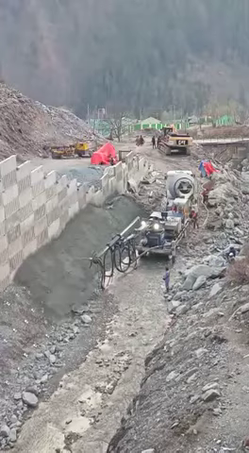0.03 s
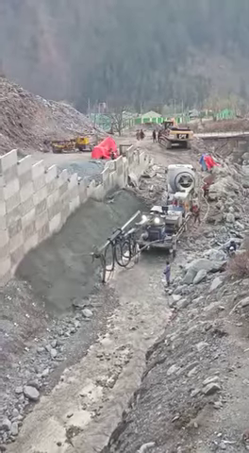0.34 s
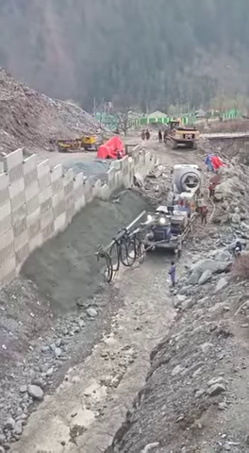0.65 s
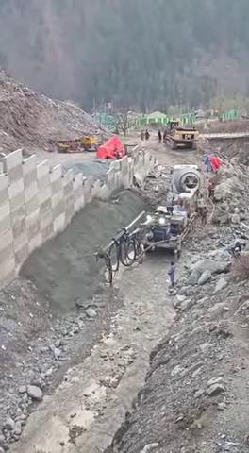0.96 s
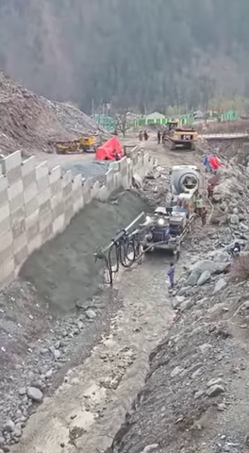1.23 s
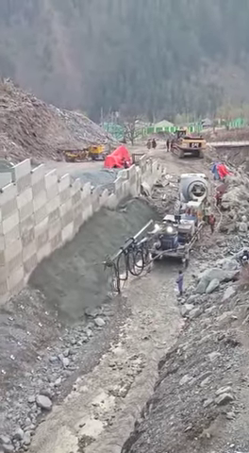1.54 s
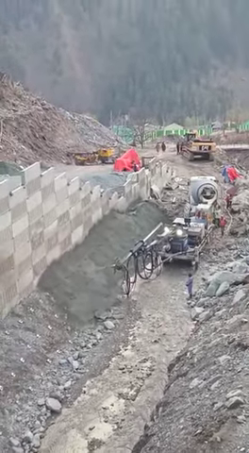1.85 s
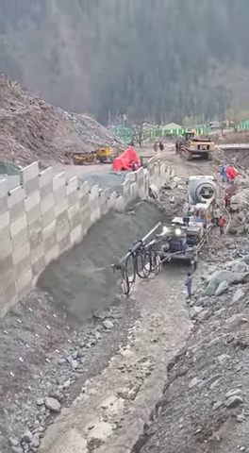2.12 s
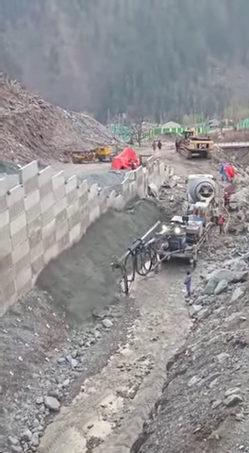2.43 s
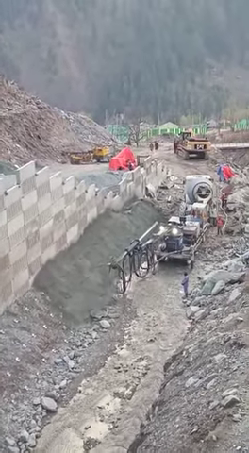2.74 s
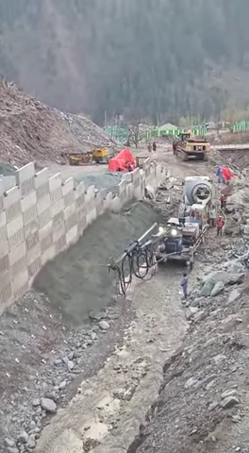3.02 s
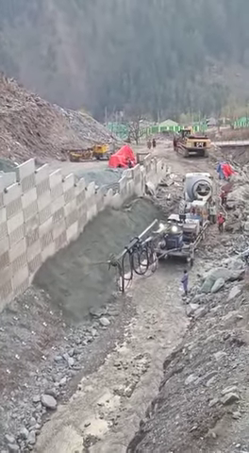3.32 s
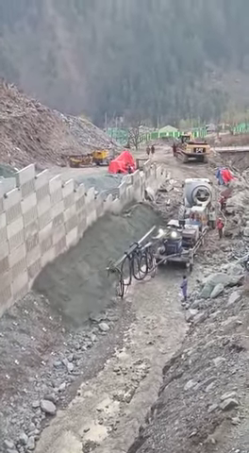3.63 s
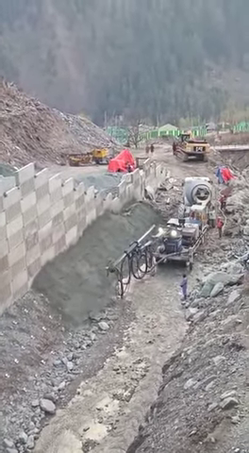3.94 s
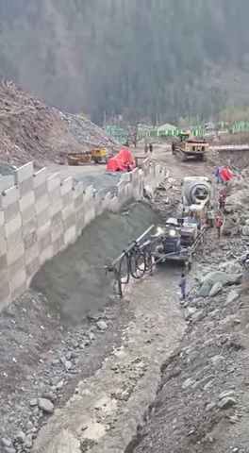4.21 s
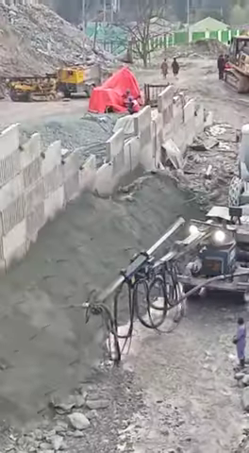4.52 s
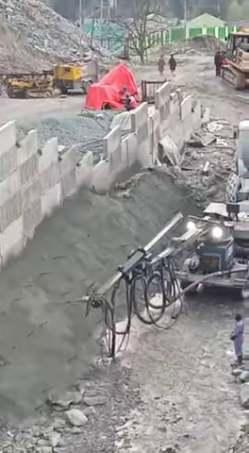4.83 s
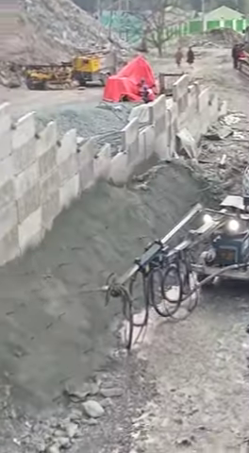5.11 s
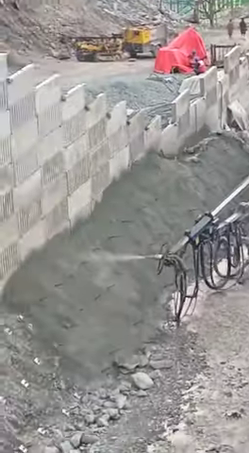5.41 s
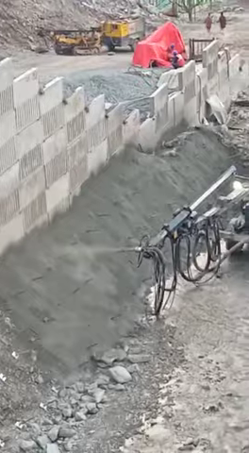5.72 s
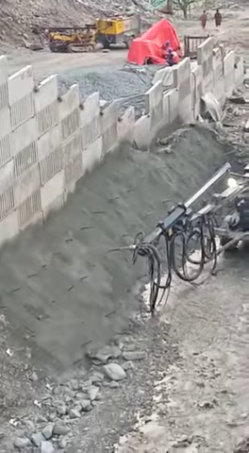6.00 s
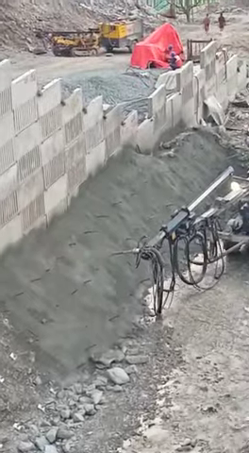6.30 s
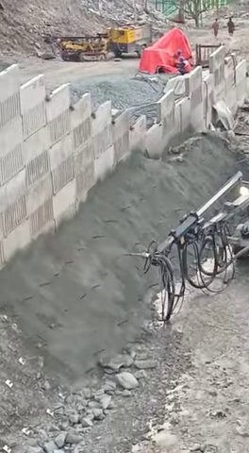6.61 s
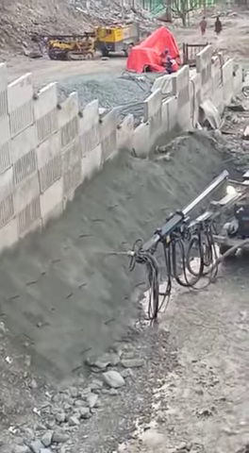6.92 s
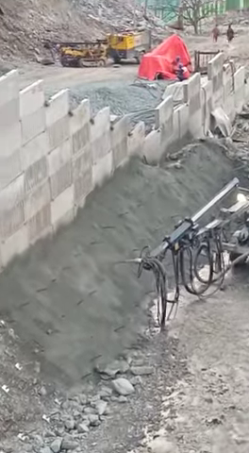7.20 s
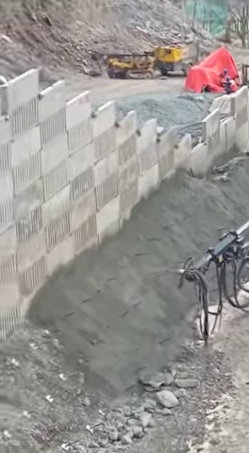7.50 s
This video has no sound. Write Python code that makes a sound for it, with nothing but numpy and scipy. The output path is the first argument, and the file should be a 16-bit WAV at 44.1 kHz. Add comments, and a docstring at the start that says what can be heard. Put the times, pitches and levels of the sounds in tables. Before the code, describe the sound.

A concrete sprayer fades in over the first 0.3 seconds and roars continuously until the end, near 7.7 seconds, some way off outdoors with a slight dull echo. The jet is gritty and sputtering, with gravel ticking through the pipe, a low hose rumble and wavering air hiss. Lumps of wet concrete burst out with irregular thuds and spatters, scattered at first, thickest from 3 to 4.8 seconds, then sparser. Faint, very high whistles flick past around 4.3 to 4.7 seconds. The hiss opens up a little near 1.5, 2.3, 5.7 and 7.5 seconds. Underneath, a diesel engine drones at a fixed speed, joined by a compressor hum and a faint pump whine, while a stream rushes steadily. Wind rumbles softly on the microphone, with a few bumps, mostly between 2 and 3 seconds.

```python
"""A concrete sprayer roars and sputters on a slope beside a stream, some way off in a valley.
Slugs (big lumps) of wet concrete break up its air jet with thuds and spatters, gravel knocks through the
pipe, and the nozzle hisses when air gets through freely. Its diesel engine drones at a fixed speed,
along with a humming compressor and a whining pump. The stream rushes underneath, and gusts of wind
bump the microphone."""
import sys
import numpy as np
from scipy import signal
from scipy.fft import rfft, irfft
from scipy.io import wavfile
from scipy.ndimage import uniform_filter1d, minimum_filter1d

SR = 44100
rng = np.random.default_rng(int(sys.argv[2]) if len(sys.argv) > 2 else 0)


def log_audio(samples):
    """Write samples as a 16-bit WAV file to the path given in sys.argv[1]."""
    # one column per channel
    frames = np.atleast_2d(samples).T
    # limit to full scale, then quantise
    limited = np.clip(frames, -1, 1)
    pcm = np.round(limited * 32767).astype(np.int16)
    wavfile.write(sys.argv[1], SR, pcm)


N = 341775
TIME = np.arange(N) / SR
AGE = np.arange(SR // 5) / SR   # seconds since the start of a short sound

# The rush of the stream: (frequency [Hz], relative level [dB])
STREAM_SPECTRUM = [(60, 3), (300, -7.5), (1000, -5), (3000, -10.5), (5300, -17), (6500, -43), (15000, -55)]
# Wind rumbling on the microphone: (frequency [Hz], relative level [dB])
WIND_SPECTRUM = [(12, -46), (30, -27), (42, -17), (55, -21.5), (76, -0.5), (105, -2), (150, -4), (260, -14),
                 (600, -37)]
# Gusts swell and die away: (peak time [s], level [dB], rise [s], fall [s])
WIND_GUSTS = [(0.82, -30.5, .08, .7), (2.48, -24, 0.67, .8), (3.9, -28, 0.18, 0.68), (7.6, -29, .12, 0.12)]
# Single bumps of wind: (time [s], relative level [dB])
WIND_BUMPS = [(2.013, -12), (2.118, -7), (2.371, -5), (2.409, -8), (2.568, -4), (2.629, -9), (2.999, -16),
              (4.179, -10)]

FIRING_HZ, COMPRESSOR_HZ = 141.6, 225.0   # pitches of the diesel and of the air compressor
# The drone of the exhaust: (time [s], level [dB])
DRONE_LEVELS = [(0.25, -24.5), (0.4, -23), (1.5, -21.5), (2.0, -27.5), (2.25, -20.5), (2.7, -24.5),
                (4.5, -25), (5.2, -22), (6.2, -25.5), (7.75, -22.5)]
# The drone dips briefly: (time [s], depth [dB], half-width [s])
DRONE_DIPS = [(0.53, 9, 0.08), (1.23, 11, 0.051), (2.52, 17, 0.055), (3.46, 7, 0.061), (4.46, 11, 0.037),
              (4.68, 5, 0.061), (5.8, 5, 0.058), (6.1, 17, 0.056), (6.94, 9, 0.056), (7.75, 11, 0.17)]
# The engine's higher tones: (multiple of the firing rate, level [dB])
ENGINE_OVERTONES = [(2, -37.5), (3, -45), (4, -45.5), (5, -45.5), (6, -49.5), (7, -44), (8, -47.5),
                    (9, -57.5), (10, -43.5), (11, -49), (12, -48.5), (15, -50)]
# The hum of the air compressor: (time [s], relative level [dB])
HUM_LEVELS = [(0.3, -34), (2.2, -36), (2.45, -23.5), (2.9, -24.5), (3.9, -28.5), (4.55, -37), (5.3, -28),
              (5.65, -36), (6.0, -29), (7.75, -34.5)]
# The whine of the hydraulic pump: (pitch [Hz], relative level [dB])
PUMP_TONES = [(795.0, -46), (1192.5, -49)]

# Air through the nozzle, heard as hiss: (time [s], relative level [dB])
AIRFLOW_LEVELS = [(0.3, -53), (0.42, -41.5), (1.1, -40), (1.6, -39), (2.4, -35.5), (2.72, -46), (3.15, -40),
                  (3.45, -39.5), (4.0, -36), (4.7, -36.5), (5.1, -41), (5.65, -35.5), (6.12, -51),
                  (6.55, -36), (7.05, -41.5), (7.75, -36.5)]
# Concrete fed to the nozzle, heard as roar: (time [s], relative level [dB])
FEED_LEVELS = [(0.3, -27.5), (0.38, -26.5), (0.46, -25), (1.65, -25), (2.65, -28), (3.05, -26.5),
               (3.35, -24.5), (4.4, -25.5), (4.8, -26), (5.4, -26.5), (5.7, -27.8), (6.15, -27),
               (6.55, -24.5), (7.1, -26), (7.75, -26)]
# The hose runs thin and air blows freely: (start [s], length [s], lip singing [dB], extra mist [dB])
FREE_AIR_SPELLS = [(1.327, 0.43, -45, 0), (2.133, 0.42, -44.5, 3.5), (4.547, 0.033, -31, -4),
                   (5.556, 0.39, -66, 5), (7.433, 0.23, -50, 2)]
# Pitches at which air rings in the nozzle: (pitch [Hz], width [Hz], level against the hiss [dB])
NOZZLE_RESONANCES = [(3153, 58, -7), (4610, 69, -7)]
# Hose rumble, fine mist, air hiss, wet spray and a slug's thud: (frequency [Hz], relative level [dB])
HOSE_SPECTRUM = [(60, -38), (110, -3.5), (165, 1), (200, -1.5), (270, 0.5), (340, -0.5), (410, -6.5),
                 (520, -9.5), (800, -50)]
MIST_SPECTRUM = [(5000, -7), (7000, 4.5), (8400, -3), (9400, -2), (11200, -0.5), (12200, -15), (13400, -10),
                 (14200, -13), (15400, -18)]
AIR_SPECTRUM = [(2500, -15), (3100, 1), (3450, 0), (4000, -4.5), (4650, 1.5), (4950, -1), (5450, -2.5),
                (5750, -11), (6400, -21.5), (8400, -42), (12000, -47)]
SPRAY_SPECTRUM = [(300, 7.5), (520, -0.5), (1150, 2), (1450, 0), (2130, 2.5), (2450, -1.5), (2850, 0.5),
                  (3400, -3.5), (3850, -9), (5300, -17), (6200, -34), (8000, -45), (11000, -43.5),
                  (15000, -71)]
THUD_SPECTRUM = [(100, -17), (190, -7.5), (280, 3.5), (360, 0), (480, -9.5), (800, -33)]
# Whistles after the biggest slugs:
# (time [s], length [s], start pitch [Hz], end pitch [Hz], relative level [dB])
WHISTLE_GLIDES = [(4.315, .04, 7100, 6300, -52), (4.443, 0.066, 7600, 6100, -51),
                  (4.483, 0.028, 6150, 6550, -46), (4.608, .04, 7460, 6900, -54),
                  (4.64, 0.05, 6500, 6350, -54)]
# Slugs leaving the nozzle:
# (time [s], spatter [dB], thud [dB], hiss [dB], length [s], pitch of the air pocket [Hz])
CONCRETE_SLUGS = [(0.325, -21, -27, -37, 0.042, 2020), (0.433, -19, -24, -44, 0.035, 2190),
                  (0.673, -23, -19.5, -44, 0.032, 2040), (1.036, -35, -17.5, -45, .022, 1300),
                  (1.269, -24, -15.5, -29.5, 0.019, 1180), (1.467, -22, -22, -33, .027, 2180),
                  (1.587, -19.5, -17.5, -31, 0.013, 2230), (1.639, -22, -16.5, -44, 0.026, 2050),
                  (2.155, -19.5, -20, -45, 0.046, 2090), (2.383, -30, -15, -42, 0.024, 2100),
                  (3.017, -26, -14, -31, 0.018, 2650), (3.09, -21.5, -22, -32, 0.017, 1435),
                  (3.144, -18, -22, -30, 0.014, 2125), (3.306, -20, -29, -37, 0.018, 1156),
                  (3.461, -31, -18, -44, 0.031, 1620), (3.678, -21, -12.5, -41, 0.013, 2106),
                  (3.72, -24, -17, -46, 0.022, 1650), (3.788, -19.5, -20, -32, 0.025, 1980),
                  (3.892, -19, -17, -36, 0.011, 2020), (3.973, -18.5, -28, -28, 0.023, 1205),
                  (4.024, -18, -15, -32, 0.012, 2790), (4.066, -16, -17.5, -26.5, 0.03, 1600),
                  (4.172, -27, -29, -40, 0.018, 1125), (4.262, -22.5, -21, -42, 0.017, 2620),
                  (4.309, -16.5, -16, -34, 0.022, 2134), (4.4, -20.5, -20, -43, 0.013, 1170),
                  (4.442, -15, -16, -35, .031, 1846), (4.541, -18, -38, -23.5, 0.019, 2040),
                  (4.557, -19.5, -32, -48, 0.023, 2680), (4.702, -20, -15, -33, .017, 1140),
                  (4.75, -24.5, -20.5, -47, 0.037, 1160), (5.318, -25, -20, -39, 0.026, 2060),
                  (5.447, -21.5, -20.5, -35, 0.037, 3080), (5.577, -27, -29, -32, 0.019, 2990),
                  (5.96, -21, -21, -41, 0.018, 2000), (6.282, -22, -14, -42, 0.017, 1600),
                  (6.56, -35, -17.5, -39, 0.032, 1590), (7.512, -23.5, -33, -29, 0.017, 1530),
                  (7.704, -19.5, -23, -36, 0.014, 2800)]
# The whole sound fades in: (time [s], level [dB])
FADE_LEVELS = [(0, -100), (.072, -70), (.082, -20), (.13, -14), (.19, -8), (.25, -3), (.32, 0)]


def from_db(db):
    """Turn decibels into a number to multiply a sound by."""
    return 10 ** (np.asarray(db) / 20)


def rms_one(x):
    """Scale a signal so that its average power is 1."""
    return x / np.sqrt(np.mean(x ** 2) + 1e-20)


def in_time(rows):
    """Join (time, level) points with straight lines, giving a level for every sample."""
    times, levels = np.transpose(rows)
    return np.interp(TIME, times, levels)


def drift(rate):
    """A smooth random wander of about 1 either way; a higher rate wanders faster."""
    step, warm_up = 20, 4000   # one value every 20 samples; the first values are skipped
    pole = np.exp(-2 * np.pi * rate * step / SR)
    white = rng.standard_normal(N // step + warm_up + 2)
    slow = signal.lfilter([1], [1, -2 * pole, pole * pole], white)[warm_up:]
    return np.interp(np.arange(N) / step, np.arange(len(slow)), rms_one(slow))


def colour(x, spectrum):
    """Shape a sound's lows and highs with a spectrum table; the result has power 1."""
    hz, db = np.transpose(spectrum)
    bin_hz = np.maximum(np.arange(N // 2 + 1) * SR / N, 1)
    bin_db = np.interp(np.log(bin_hz), np.log(hz), db, left=-80, right=-80)
    return rms_one(irfft(rfft(x) * from_db(bin_db), N))


def noise(spectrum):
    """Smooth noise with the given spectrum."""
    return colour(rng.standard_normal(N), spectrum)


def grit(spectrum, per_s, size_db):
    """Crackly noise made of tiny clicks, a few large among many small."""
    sizes = from_db(size_db * np.minimum(rng.exponential(1, N), 4))
    hits = rng.random(N) < per_s / SR
    return colour(hits * sizes * rng.standard_normal(N), spectrum)


def puff(length_s, rise_s):
    """The loudness of a burst: a quick rise, a short hold, a fall."""
    return (1 - np.exp(-AGE / rise_s)) * np.exp(-(AGE / max(length_s, rise_s)) ** 2)


def hump(peak_s, rise_s, fall_s):
    """A smooth swell up to 1 and back down."""
    return np.exp(-((TIME - peak_s) / np.where(TIME < peak_s, rise_s, fall_s)) ** 2)


def spell(start_s, length_s, edge_s=0.056):
    """A level that opens to 1, holds and closes; a very short spell only opens part way."""
    inside_s = np.minimum(TIME - start_s, start_s + length_s - TIME)
    return np.clip(0.5 + inside_s / edge_s, 0, 1)


def placed(events):
    """Add up short sounds, each given as (start time, sound)."""
    out = np.zeros(N + SR)
    for s, sound in events:
        out[int(s * SR):][:len(sound)] += sound
    return out[:N]


def stream():
    """Running water makes a steady rush."""
    return from_db(-32.5) * noise(STREAM_SPECTRUM)


def wind(breeze_db=-38):
    """A breeze rumbles on the microphone, swelling with each gust, with a few harder bumps."""
    gusts = [from_db(db) * hump(s, rise_s, fall_s) for s, db, rise_s, fall_s in WIND_GUSTS]
    strength = np.sqrt(from_db(breeze_db) ** 2 + np.sum(np.square(gusts), axis=0))
    rumble = strength * from_db(2.0 * drift(7.1))
    bumps = placed((s, from_db(db - 6.5) * puff(length_s=0.019, rise_s=0.0071)) for s, db in WIND_BUMPS)
    return (rumble + bumps) * noise(WIND_SPECTRUM)


def with_echoes(x, echo_db, cutoff_hz):
    """The retaining wall and the banks send back six dull echoes."""
    dull = signal.sosfilt(signal.butter(1, cutoff_hz, fs=SR, output="sos"), x)
    delays = (rng.uniform(0.015, 0.11, size=6) * SR).astype(int)
    return x + from_db(echo_db) * sum(np.pad(dull, (delay, 0))[:N] for delay in delays)


def far_tone(hz, clock, waver_db, waver_rate):
    """A distant machine tone that wavers as it crosses the moving air."""
    phase = 2 * np.pi * (hz * clock + rng.random()) + 0.34 * drift(2.5)
    return rms_one(np.sin(phase) * from_db(waver_db * drift(waver_rate)))


def machinery(clock):
    """The diesel's exhaust drones at its firing rate, the compressor hums and the pump whines."""
    drone_db = in_time(DRONE_LEVELS) - sum(db * hump(s, width, width) for s, db, width in DRONE_DIPS)
    drone = from_db(drone_db) * far_tone(FIRING_HZ, clock, waver_db=2.4, waver_rate=13.3)
    overtones = sum(from_db(db) * far_tone(k * FIRING_HZ, clock, waver_db=3.5, waver_rate=1.8)
                    for k, db in ENGINE_OVERTONES)
    hum = from_db(in_time(HUM_LEVELS) - 2) * far_tone(COMPRESSOR_HZ, clock, waver_db=3.5, waver_rate=6.3)
    whine = sum(from_db(db - 1) * far_tone(hz, clock, waver_db=3.5, waver_rate=4.4)
                for hz, db in PUMP_TONES)
    return drone + overtones + hum + whine


def hose_rumble(feed_db, lumps, free_air):
    """The hose rumbles a little louder with more concrete, and softer when air blows freely."""
    extra_feed_db = feed_db + 26   # the usual feed is -26 dB
    level_db = -28 + 0.2 * extra_feed_db - 2.5 * free_air
    return from_db(level_db + 1.92 * lumps + 1.7 * drift(4.3)) * noise(HOSE_SPECTRUM)


def mist(air_db, lumps, boost_db):
    """Fine mist adds a faint, very high hiss that partly follows the airflow."""
    extra_air_db = air_db + 40   # the usual airflow is -40 dB
    level_db = -66 + 0.35 * extra_air_db + boost_db
    return from_db(level_db + lumps + drift(9)) * noise(MIST_SPECTRUM)


def ringing_air(hz, width_hz):
    """Rushing air rings around one pitch; a smaller width gives a purer note."""
    pole = np.exp(-np.pi * width_hz / SR)
    feedback = [1, -2 * pole * np.cos(2 * np.pi * hz / SR), pole * pole]
    return rms_one(signal.lfilter([1, 0, -1], feedback, noise(AIR_SPECTRUM)))


def air_hiss(air_db, lumps, free_air):
    """Air hisses out and rings in the nozzle, louder when it gets through freely."""
    hiss = grit(AIR_SPECTRUM, per_s=16000, size_db=2.0)
    ringing = sum(from_db(db + 3.6 * drift(16)) * ringing_air(hz, width_hz)
                  for hz, width_hz, db in NOZZLE_RESONANCES)
    return from_db(air_db - 3 + 2.5 * free_air + 2 * lumps) * (hiss + ringing)


def gravel(feed_db, lumps, per_s=220, ring_s=0.012, size_db=12.5):
    """Stones knock through the steel pipe and onto the slope, each ringing briefly at its own pitch."""
    age = AGE[:SR // 12]
    shape = (1 - np.exp(-age / 0.0017)) * np.exp(-age / ring_s)
    knocks = []
    for pitch, when, size, phase in rng.random((int(per_s * N / SR), 4)):
        hz = 450 + 3200 * pitch
        tone = np.sin(2 * np.pi * (hz * age + phase))
        knocks.append((when * N / SR, from_db(size_db * size) * shape * tone))
    return from_db(feed_db - 4.5 + 1.1 * lumps) * colour(placed(knocks), SPRAY_SPECTRUM)


def whistles():
    """Short, breathy whistles slide in pitch high above the roar."""
    glides = []
    for s, length_s, start_hz, end_hz, db in WHISTLE_GLIDES:
        hz = np.linspace(start_hz, end_hz, int(length_s * SR))
        flicker = 0.6 + 0.8 * drift(150)[int(s * SR):][:len(hz)]
        swell = np.sqrt(np.hanning(len(hz)))
        tone = np.sin(2 * np.pi * np.cumsum(hz) / SR)
        glides.append((s, from_db(db + 2.5) * swell * flicker * tone))
    return placed(glides)


def slugs():
    """Air trapped behind each slug bursts out with a thud, spatter and hiss; its pocket rings briefly."""
    spatters, thuds, hisses, rings = [], [], [], []
    flutter = 0.5 * drift(140)   # the ring is unsteady while the slug moves
    for s, spatter_db, thud_db, hiss_db, length_s, ring_hz in CONCRETE_SLUGS:
        burst = puff(length_s, rise_s=0.0014)
        spatters.append((s, from_db(spatter_db) * burst))
        thuds.append((s, from_db(thud_db) * burst))
        hisses.append((s, from_db(hiss_db) * burst))
        wobble = np.take(flutter, int(s * SR) + np.arange(len(AGE)), mode="wrap")
        tone = np.sin(2 * np.pi * ring_hz * AGE + wobble)
        ring_db = -20 + 0.92 * (spatter_db + 21)   # a spatter above the usual -21 dB rings louder
        rings.append((s, from_db(ring_db) * puff(length_s=0.016, rise_s=0.0037) * tone))
    spatter = placed(spatters) * grit(SPRAY_SPECTRUM, per_s=9000, size_db=3.0)
    thud = placed(thuds) * noise(THUD_SPECTRUM)
    hiss = placed(hisses) * noise(AIR_SPECTRUM)
    return spatter + thud + hiss + placed(rings)


def sputter(per_s, fall_s, rise_s, spread_db):
    """Small lumps pass the nozzle at random, each making the loudness jump and fall back."""
    lumps = (rng.random(N) < per_s / SR) * from_db(spread_db * rng.random(N))
    poles = np.exp(-1 / (np.array([fall_s, rise_s]) * SR))
    level = signal.lfilter([1], np.poly(poles), lumps + 1e-18)
    return rms_one(level - level.mean())


def spray_roar(feed_db, lumps, clock):
    """Flying grit and droplets blend into a roar that throbs slightly as the diesel fires."""
    throb = 1 + 0.037 * np.cos(2 * np.pi * FIRING_HZ * clock)
    return from_db(feed_db - 2.3 + 0.63 * lumps) * throb * grit(SPRAY_SPECTRUM, per_s=9000, size_db=1.0)


def nozzle(clock):
    """The running jet shakes with the lumps passing through; free air makes the nozzle's lip sing."""
    feed_db, air_db = in_time(FEED_LEVELS), in_time(AIRFLOW_LEVELS)
    starts, lengths, lip_db, extra_mist_db = np.transpose(FREE_AIR_SPELLS)
    spells = np.array([spell(start, length) for start, length in zip(starts, lengths)])
    free_air = spells.sum(axis=0)
    lumps = sputter(per_s=110, fall_s=0.013, rise_s=0.0016, spread_db=7.5)
    concrete = spray_roar(feed_db, lumps, clock) + gravel(feed_db, lumps)
    hose = hose_rumble(feed_db, lumps, free_air)
    hiss = air_hiss(air_db, lumps, free_air)
    lip = (from_db(lip_db) @ spells) * ringing_air(hz=5170, width_hz=78)   # each spell at its own level
    return concrete + hose + hiss + lip + mist(air_db, lumps, boost_db=extra_mist_db @ spells)


def scene():
    """Stream, machinery, wind and spray all reach one microphone."""
    clock = np.cumsum(1 + 0.00056 * drift(1.35)) / SR   # engine time: its speed is held nearly steady
    spray = with_echoes(nozzle(clock) + slugs() + whistles(), echo_db=-20, cutoff_hz=3500)
    return (stream() + machinery(clock) + wind() + spray)[None]


def record(dry, ceiling=0.9, cutoff_hz=15500):
    """The sound fades in, a limiter turns down the highest peaks, and the top treble is cut."""
    faded = dry * from_db(in_time(FADE_LEVELS))
    safe_gain = np.minimum(1, ceiling / (np.abs(faded) + 1e-9))
    smooth_gain = uniform_filter1d(minimum_filter1d(safe_gain, size=221), size=221)   # over 5 ms
    treble_cut = signal.ellip(10, 0.1, 90, cutoff_hz, fs=SR, output="sos")
    return signal.sosfilt(treble_cut, faded * smooth_gain)


dry = scene()
out = record(dry)
log_audio(out)
```